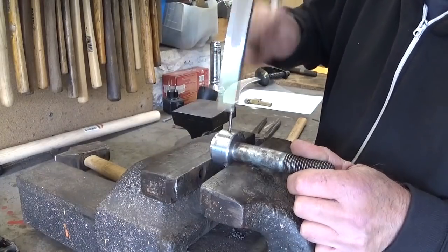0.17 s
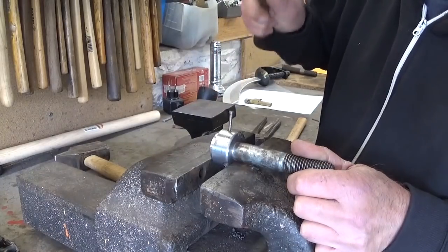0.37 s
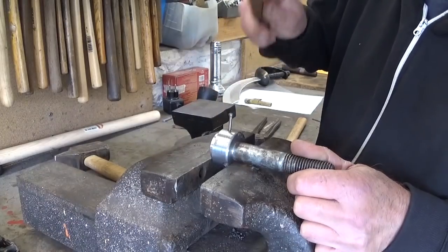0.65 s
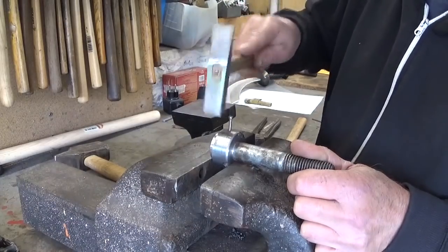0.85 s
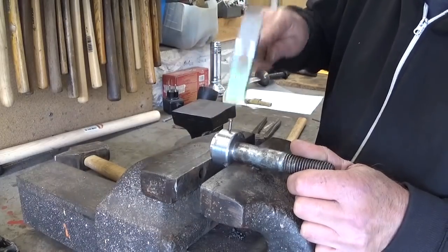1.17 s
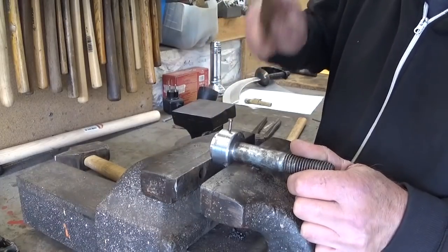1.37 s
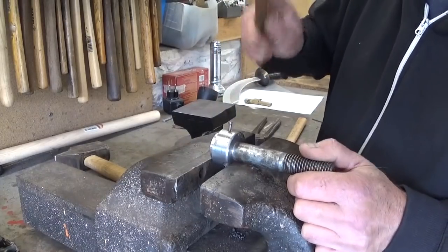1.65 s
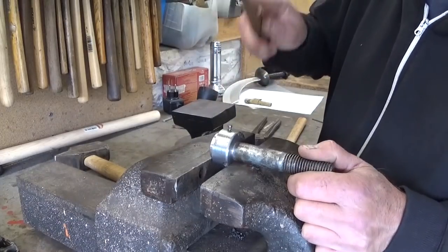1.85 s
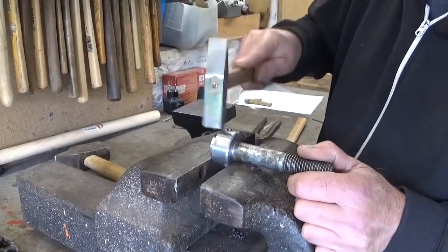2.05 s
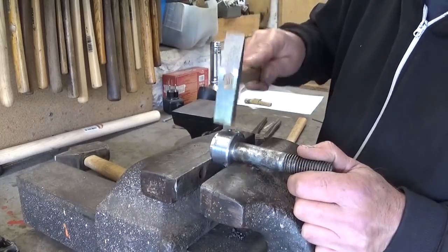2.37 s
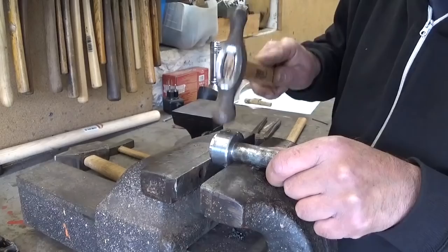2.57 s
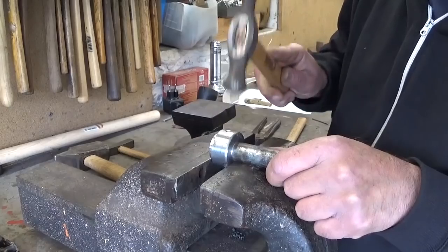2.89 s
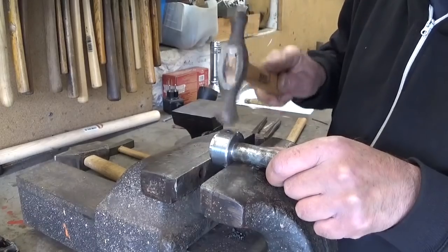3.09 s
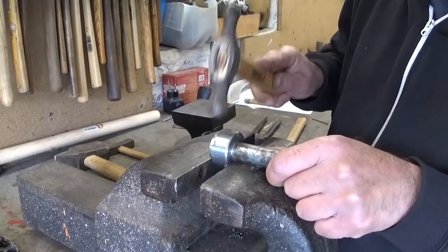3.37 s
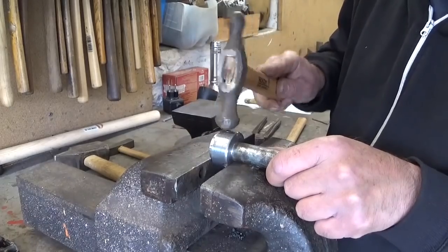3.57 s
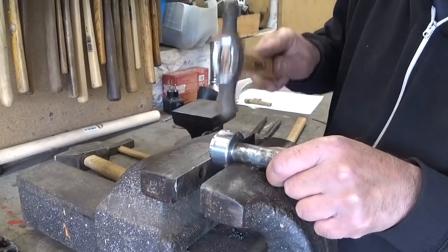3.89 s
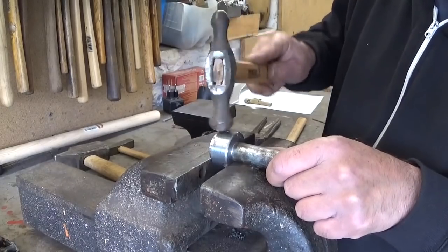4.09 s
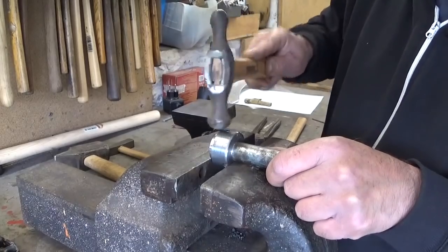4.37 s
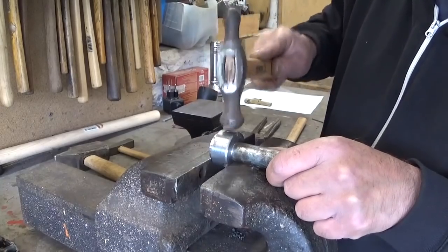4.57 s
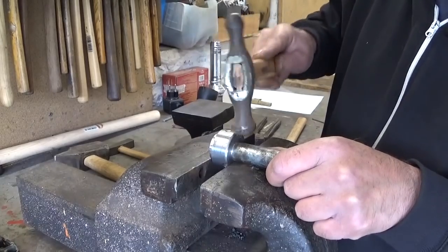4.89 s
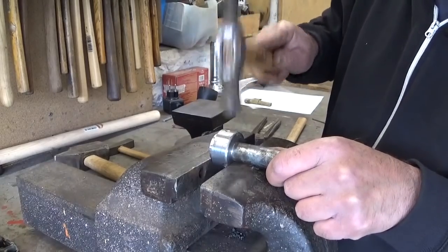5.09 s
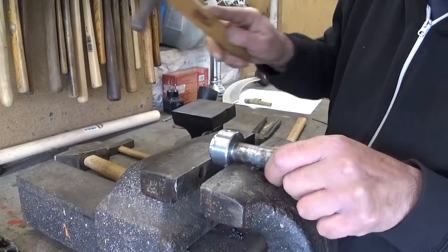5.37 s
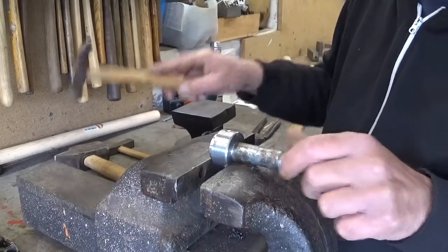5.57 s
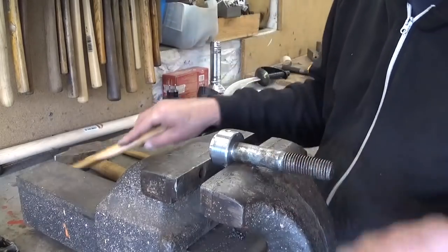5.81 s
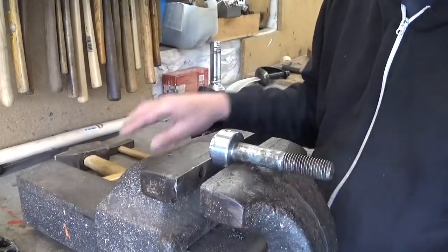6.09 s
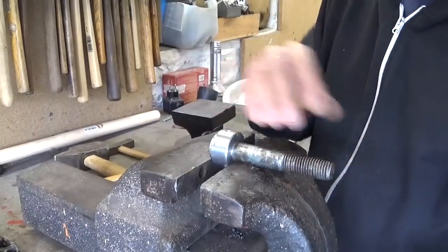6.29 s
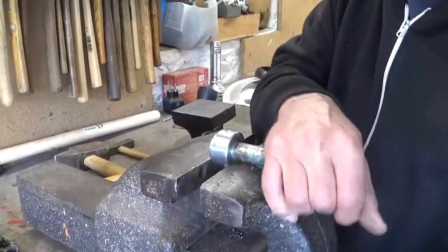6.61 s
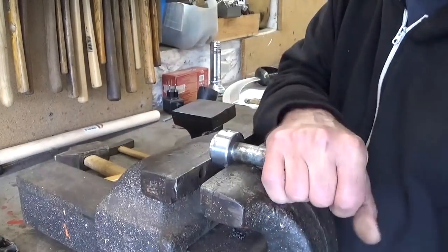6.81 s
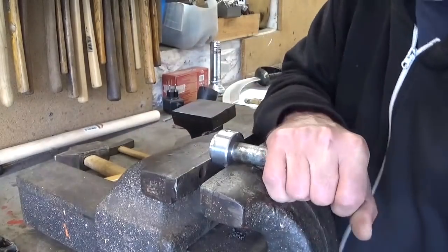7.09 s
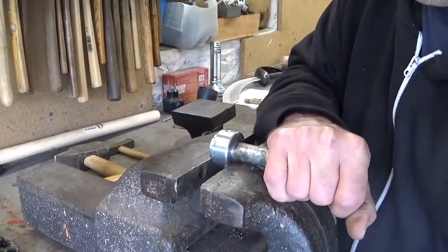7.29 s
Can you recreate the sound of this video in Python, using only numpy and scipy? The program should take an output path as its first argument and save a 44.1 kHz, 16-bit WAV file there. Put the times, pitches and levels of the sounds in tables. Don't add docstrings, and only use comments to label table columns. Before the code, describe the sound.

Close in a small, lively workshop, a flat hammer face strikes a steel pin in a vise, about three blows a second, ringing bright. The last skids into dull bounces, then the ball end taps on, rounder and steady. The hammer is laid on a hollow wooden bench and jingles against tools; finally the vise handle clunks, scrapes and drops.

```python
import sys
import numpy as np
from scipy import signal
from scipy.fft import rfft, irfft, next_fast_len
from scipy.io import wavfile
from scipy.ndimage import uniform_filter1d, minimum_filter1d

SR = 44100
rng = np.random.default_rng(int(sys.argv[2]) if len(sys.argv) > 2 else 0)


def pcm_store(signal):
    levels = np.round(np.clip(np.atleast_2d(signal), -1, 1) * 32767)
    wavfile.write(sys.argv[1], SR, levels.astype(np.int16).T)


def boost_factor(decibels):
    exponent = np.asarray(decibels, float) / 20
    return 10 ** exponent


N = 328545
TAIL = SR // 2
HUM = 7 * SR // 10


def unit(x):
    return x / np.sqrt(np.mean(x ** 2) + 1e-20)


def along(points, hz):
    f, v = np.transpose(points)
    return np.interp(np.log(hz + 1), np.log(f + 1), v)


def filtered(x, response):
    size = next_fast_len(x.shape[-1] + 4096)
    spectrum = rfft(x, size) * response(np.fft.rfftfreq(size, 1 / SR))
    return irfft(spectrum, size)[..., :x.shape[-1]]


# (frequency [Hz], likeness [0-1])
LIKENESS = [(60, 1), (150, .96), (490, .7), (1410, .76), (4030, .6), (11500, .76)]


def paired(two):
    def turn(hz):
        return np.arccos(np.clip(along(LIKENESS, hz), -1, 1)) / 2

    mid, side = filtered(two, lambda hz: np.array([np.cos(turn(hz)), np.sin(turn(hz))]))
    return np.array([mid + side, mid - side])


def ring(modes, scatter_db, size=TAIL):
    hz, db, t60 = np.transpose(modes)
    db = db + scatter_db * rng.standard_normal(hz.shape)
    hz = hz + 1.2 / t60 * rng.standard_normal(hz.shape)
    start = boost_factor(db) * np.exp(2j * np.pi * rng.random(hz.shape))
    step = boost_factor(-60 / t60 / SR) * np.exp(2j * np.pi * hz / SR)
    impulse = signal.unit_impulse(size)
    return sum(signal.lfilter([a], [1, -p], impulse).imag for a, p in zip(start, step))


def click(colour):
    cepstrum = irfft(np.log(boost_factor(along(colour, np.fft.rfftfreq(4096, 1 / SR))) + 1e-6))
    cepstrum = cepstrum * np.r_[1, 2 * np.ones(2047), 1, np.zeros(2047)]
    pulse = irfft(np.exp(rfft(cepstrum)))
    return np.pad(pulse / np.linalg.norm(pulse), (0, TAIL - 4096))


# (frequency [Hz], decay t60 [s])
SHOP_DECAY = [(100, 0.57), (300, 0.52), (750, 0.51), (2000, 0.41), (5000, 0.45), (8000, 0.37), (11000, 0.3)]
# (delay [s], length [s], level [dB])
FAR_WALL_ECHO = (.04, .014, 3)


def shop(liveliness, bloom_s, patchy_db):
    hz, t, z = signal.stft(rng.standard_normal((2, TAIL)), SR, nperseg=128)
    t60 = liveliness * along(SHOP_DECAY, hz)[:, None]
    patches = uniform_filter1d(rng.standard_normal(z.shape[1:]), size=3, axis=0)
    patches = uniform_filter1d(patches, size=14, axis=1)
    delay, length, echo_db = FAR_WALL_ECHO
    echo = echo_db * np.exp(-((t - delay) / length) ** 2)
    db = patchy_db * unit(patches) * hz[:, None] / 8000 + echo - 60 * t / t60
    tail = signal.istft(z * boost_factor(db) / np.sqrt(t60), SR, nperseg=128)[1][:, :TAIL]
    tail = paired(tail * (1 - np.exp(-np.arange(TAIL) / SR / bloom_s)))
    return tail / np.linalg.norm(tail, axis=1, keepdims=True)


# (frequency [Hz], level [dB per Hz])
FLOOR_THUD = [(20, -34.5), (35, -10), (48, -17), (68, -2), (90, -11.5), (110, -18), (200, -25), (400, -50)]


def strikes(rows, colour, body, head, part, drive_db, body_db, crack_s, direct_db,
            liveliness, thud_t60, pan_db, near_db, far_db):
    out = np.zeros((2, N + SR + 2 * TAIL))
    t = np.arange(TAIL) / SR
    blow, place = click(colour), shop(liveliness, bloom_s=0.0059, patchy_db=2)
    for s, db, head_db, thud_db, bright_db, part_db in rows:
        def slope(hz):
            return boost_factor((bright_db + 8.5) * 0.3 * np.log2((hz + 100) / 2000))

        steel = boost_factor(body_db) * ring(body, scatter_db=2)
        tool = boost_factor(head_db - 24) * ring(head, scatter_db=1.0)
        tool = tool + boost_factor(part_db - 29) * ring(part, scatter_db=-1.5)

        burst = t * boost_factor(-60 * t / crack_s) * rng.standard_normal(TAIL)
        crack = signal.fftconvolve(burst / np.linalg.norm(burst), blow[:4096])[:TAIL]
        crack = filtered(crack, lambda hz: boost_factor(4.25 * np.log2((hz + 100) / 2500)))

        room = .8 * place + .6 * shop(liveliness, bloom_s=.005, patchy_db=5)
        far = filtered(blow + steel, slope) + boost_factor(far_db) * tool
        heard = signal.fftconvolve(far[None], room, axes=1)[:, :TAIL]
        near = filtered(crack + steel, slope) + boost_factor(near_db) * tool
        heard = heard + boost_factor(direct_db) * near * (1 - np.exp(-t / 0.00043))

        noise = rng.standard_normal((2, TAIL))
        shake = paired(filtered(noise, lambda hz: boost_factor(along(FLOOR_THUD, hz))))
        shake = shake * boost_factor(-60 * t / thud_t60) * (1 - np.exp(-t / .015))
        heard = boost_factor(29.5) * heard + boost_factor(thud_db + 30.0) * shake / np.linalg.norm(shake[0])
        begin = SR + round(s * SR)
        out[:, begin:begin + TAIL] += boost_factor(db + drive_db) * heard
    return out[:, SR:SR + N] * boost_factor(pan_db * np.array([[.5], [-.5]]))


def felt(blows, feel):
    usual_db, thud_db, thud_grows, bright_db, bright_grows = feel
    return [(s, db, head_db, thud_db + thud_grows * (db - usual_db),
             bright_db + bright_grows * (db - usual_db), bolt_db)
            for s, db, head_db, bolt_db in blows]


def friction(rows, width, grain_db):
    s, db, centre = np.transpose(rows)
    start = 5 * SR
    t = np.arange(start, N) / SR
    where = np.log(np.interp(t, s, centre))
    noise = rng.standard_normal((2, len(t)))
    grains = noise * boost_factor(grain_db * unit(uniform_filter1d(rng.standard_normal(len(t)), size=60)))
    mix = 0
    for band in np.log(np.geomspace(3000, 10500, 14)):
        sound = filtered(grains, lambda hz: np.exp(-((np.log(hz + 1) - band) / 0.075) ** 2))
        mix = mix + np.exp(-((where - band) / width) ** 4) * sound
    level = boost_factor(np.interp(t, s, db, left=-120, right=-120))
    return np.pad(level * unit(paired(mix)), ((0, 0), (start, 0)))


# (frequency [Hz], level [dB per Hz])
ROOM_TONE = [(15, -32), (25, 3.5), (54, -0.5), (231, -2), (448, -2.5), (484, -3), (1870, -8.5), (2020, -9),
             (2300, -9.5), (4140, -7.5), (11200, -18), (14600, -51.5), (22000, -120)]


def air():
    noise = rng.standard_normal((2, N))
    return boost_factor(-61.5) * unit(paired(filtered(noise, lambda hz: boost_factor(along(ROOM_TONE, hz)))))


# (time [s], strength [dB], head ring [dB], bolt ring [dB])
FLAT_FACE_BLOWS = [
    (-0.07, -12.5, -33, -23.5),
                   (0.232, -12.5, -13, -16.5),
    (0.54, -11, -6, -15.5),
    (0.845, -12.5, 3.5, -18.5),
    (1.141, -10.5, -32, -30),
    (1.453, -11.5, -5, -16),
    (1.751, -15, 0.5, -39),
    (2.054, -14, 8.5, -18),
    (2.348, -8.5, -33.5, -16),
]
# (frequency [Hz], level [dB per Hz])
FLAT_COLOUR = [(71, -18.5), (120, -13), (361, -8.5), (626, -14), (987, -3), (1220, -17.5), (1810, 2.5),
               (3450, -13.5), (3800, -17.5), (5050, -14), (9620, -12.5), (10600, -14), (11200, -20),
               (14600, -53.5), (22000, -120)]
# (frequency [Hz], level [dB], decay t60 [s])
FLAT_VISE = [(355, -18, .07), (974, -9, .055), (1060, -11, .05), (1328, -16, .08), (1776, -6, .1),
             (1884, -5, .08), (2050, -12, .09), (2202, -8, .09), (2555, -3, .065), (2800, -9, .06),
             (3063, -13, .05), (4350, -16, .025), (5100, -9, .04), (5230, -11, .04), (5857, -18, .025),
             (7284, -18, .025), (7817, -18, .025), (8565, -18, .025)]
FLAT_HEAD = [(10551, 0, .08), (10590, -4, .05), (10500, -6, .04), (10640, -18, .3)]
FLAT_BOLT = [(3380, 11, 0.17), (3220, -3.5, 0.027), (3460, -9, .05)]
# (usual strength [dB], thud [dB], thud growth [dB/dB], brightness [dB], brightness growth [dB/dB])
FLAT_FEEL = (-12.5, -21.5, -1.7, -12.5, -0.4)


def flat_face():
    return strikes(felt(FLAT_FACE_BLOWS, FLAT_FEEL), FLAT_COLOUR, FLAT_VISE, FLAT_HEAD, FLAT_BOLT,
                   drive_db=2.0, body_db=-23.5, crack_s=0.046, direct_db=-15.5, liveliness=0.95,
                   thud_t60=0.93, pan_db=-0.3, near_db=11, far_db=-8.5)


# (frequency [Hz], level [dB per Hz])
STEEL_COLOUR = [(71, -49.5), (120, -11.5), (334, -4.5), (420, -2.5), (864, -3.5), (1040, -6), (1500, -4),
                (3450, -27.5), (11200, -57.5), (14600, -84), (22000, -120)]
# (frequency [Hz], level [dB], decay t60 [s])
BAR_BODY = [(412, -3, 0.14), (790, 2, 0.017), (1850, 6.5, 0.02), (2096, -3, 0.036)]
BAR_FREE = [(1640, 2, 0.045), (3360, 2.5, 0.14), (3900, -12, .04)]
BAR_KNOCKED = [(1087, 16, 0.057), (1225, 1.5, 0.06)]


def handle_steel(rows):
    return strikes(rows, STEEL_COLOUR, BAR_BODY, BAR_FREE, BAR_KNOCKED, drive_db=-7.5, body_db=-33,
                   crack_s=0.041, direct_db=4.5, liveliness=1.0, thud_t60=0.78, pan_db=0.2,
                   near_db=-5.0, far_db=-12)


# (time [s], strength [dB])
GRAZE_TIMES = [
    (0.534, -38.5),
    (1.132, -35),
    (2.049, -33),
    (6.817, -44),
]
# (time [s], strength [dB], ring [dB])
CARRY_TICKS = [
    (5.437, -50, -31.5),
    (5.55, -57, -33),
    (5.628, -51.5, -11),
]
# (ring [dB], thud [dB], brightness [dB], knock [dB])
GRAZE_SOUND = (-28.5, -32.5, 2.5, -24.5)
# (thud [dB], brightness [dB], knock [dB])
TICK_SOUND = (-36, 33, -28.5)


def grazes():
    brushed = [row + GRAZE_SOUND for row in GRAZE_TIMES]
    ticked = [row + TICK_SOUND for row in CARRY_TICKS]
    return handle_steel(brushed + ticked)


# (time [s], strength [dB], head ring [dB], bolt ring [dB])
SKID_BOUNCES = [
    (2.37, -15, -31.5, -28.5),
    (2.398, -13, -36, -33),
    (2.44, -26, -30.5, -28),
]
# (frequency [Hz], level [dB per Hz])
ROUND_COLOUR = [(71, -48), (150, -18), (250, -15.5), (370, -11), (500, -23), (620, -5.5), (880, -14.5),
                (1050, -2.5), (1440, -7.5), (2550, -2.5), (4300, -6), (5000, -16), (7240, -13.5),
                (11200, -27)]
# (usual strength [dB], thud [dB], thud growth [dB/dB], brightness [dB], brightness growth [dB/dB])
ROUND_FEEL = (-12.5, -30.5, -0.3, -9, 0.24)


def skid():
    return strikes(felt(SKID_BOUNCES, ROUND_FEEL), ROUND_COLOUR, FLAT_VISE, FLAT_HEAD, FLAT_BOLT,
                   drive_db=-1.5, body_db=-29.5, crack_s=0.03, direct_db=-10.5, liveliness=0.9,
                   thud_t60=0.6, pan_db=-2.5, near_db=5, far_db=-11.5)


# (time [s], strength [dB], head ring [dB], bolt ring [dB])
ROUND_BLOWS = [(2.605, -20.5, -15.5, -32), (2.786, -11.5, -16.5, -63), (3.049, -12.5, -21.5, -61),
               (3.311, -10, -29, -46), (3.575, -9.5, -16, -60), (3.827, -10, -13, -27.5),
               (4.089, -10.5, -21.5, -33.5), (4.358, -9, -13.5, -35), (4.621, -10, -17, -24),
               (4.885, -13, -17.5, -26), (5.165, -10.5, -18, -35)]
# (frequency [Hz], level [dB], decay t60 [s])
ROUND_VISE = [(1040, -11, .05), (1200, -19, .3), (1326, -12, .08), (1776, -14, .07), (2140, -10, .07),
              (620, -20, .05), (2420, -9, .05), (2564, -6, .045), (2800, -7, .06), (3055, -8, .05),
              (3392, -8, .05), (3870, -11, .03), (4060, -10, .03), (5173, -14, .025), (5556, -10, .025),
              (6153, -10, .025), (7962, -18, .02), (9146, -18, .02)]
ROUND_HEAD = [(7001, 4, .18), (6984, 2, .12), (7027, 0, .09)]
ROUND_BOLT = [(10640, 8, .25), (10615, 4, .15)]


def ball_end():
    return strikes(felt(ROUND_BLOWS, ROUND_FEEL), ROUND_COLOUR, ROUND_VISE, ROUND_HEAD, ROUND_BOLT,
                   drive_db=3.0, body_db=-24.0, crack_s=0.028, direct_db=-11.5, liveliness=0.92,
                   thud_t60=.7, pan_db=-1.0, near_db=4.5, far_db=-1.3)


# (frequency [Hz], level [dB], decay t60 [s])
HANGING_TOOLS = [(453, -51, 1.6), (2010, -54, 1.7)]


def wall_tools():
    out, t = np.zeros(N + HUM), np.arange(HUM) / SR
    fade = (1 - np.exp(-t / 0.0079)) * np.minimum(1, (t[-1] - t) * 10)
    for s, *_ in ROUND_BLOWS:
        out[round(s * SR):][:HUM] += ring(HANGING_TOOLS, scatter_db=0, size=HUM) * fade
    return out[:N]


# (time [s], length [s], level [dB], centre [Hz], glide [Hz])
HAND_RUBS = [
    (5.57, .25, -64, 5100, -900),
    (6.48, 0.095, -57, 8450, 5),
    (6.58, 0.24, -66.5, 8900, 102),
    (6.81, 0.34, -59.5, 9100, -300),
    (7.19, 0.12, -48, 5600, 2200),
    (7.385, 0.09, -58, 5480, 50),
]


def rubbing():
    shape = [(0, -19), (0.33, 0), (0.46, 0), (1, -19)]  # (share of length, level [dB])
    strokes = sorted((s + part * length, db + under_db, hz + part * glide_hz)
                     for s, length, db, hz, glide_hz in HAND_RUBS for part, under_db in shape)
    return friction(strokes, width=0.15, grain_db=1.5)


# (time [s], strength [dB], brightness [dB])
WOOD_LANDING = [
    (5.952, -4.5, -23.5),
    (5.985, -7, -5),
    (6.011, -39, -4),
    (6.112, -26, -41),
]
# (time [s], strength [dB], steel jingle [dB], loose bar [dB])
TOOL_RATTLE = [
    (6.136, -3, -11, -8.5),
    (6.165, -6, -9, 2.5),
    (6.205, -3, -8.5, -43),
    (6.24, -16, -34, -43),
    (6.27, -44, -19, -25),
    (6.39, -36.5, -23, -15),
]
# (frequency [Hz], level [dB per Hz])
WOOD_COLOUR = [(59, -35.5), (100, -32.5), (140, -24.5), (238, -6), (476, -8), (627, -13), (895, -17),
               (4170, -29), (7110, -55), (9380, -36), (11200, -51), (14600, -76), (22000, -120)]
# (frequency [Hz], level [dB], decay t60 [s])
BENCH_WOOD = [(230.3, -17.5, 0.75), (308.4, -16, 0.69), (344, -8.5, 0.31), (423, -7.5, 0.12),
              (532, -6, 0.18), (637, -16, 0.32), (810, -27, 0.11), (1720, -21, 0.078)]
STEEL_TOOLS = [(2190, -5, 0.03), (3190, 1.5, 0.086), (4800, -31, .04), (5270, -13, 0.06),
               (5930, -12, 0.036), (6730, -15, 0.042), (6550, -10.5, 0.07), (7400, -13, .15),
               (7600, -11.5, .05), (8450, -14, .05), (10700, -24, .05)]
LOOSE_BAR = [(4100, -1, 0.13), (4260, -13, 0.074), (9720, -25.5, 0.11), (9100, -12, 0.2)]


def bench():
    jingle_db, thud_db, loose_db = -38, -29.5, -31.5
    wood = [(s, db, jingle_db, thud_db, bright_db, loose_db) for s, db, bright_db in WOOD_LANDING]
    thud_db, bright_db = -33, -3.5
    steel = [(s, db, jingle, thud_db, bright_db, loose) for s, db, jingle, loose in TOOL_RATTLE]
    return strikes(wood + steel, WOOD_COLOUR, BENCH_WOOD, STEEL_TOOLS, LOOSE_BAR, drive_db=-8.0,
                   body_db=-34.5, crack_s=0.028, direct_db=-9.0, liveliness=0.87, thud_t60=0.65,
                   pan_db=-0.3, near_db=6, far_db=-3)


# (time [s], strength [dB], thud [dB], brightness [dB], knock [dB])
HANDLE_KNOCKS = [
    (6.821, -25, 2, 25, -18),
    (6.83, -37.5, 0.5, -40, 11),
    (6.989, -36, 3.5, -3.5, -16),
    (7.077, -23.5, -18, 7, 0.5),
    (7.174, -34.5, -14, 19, -20.5),
    (7.184, -41, 18.5, -38, 9.5),
    (7.247, -43.5, 3, 36, -37),
    (7.297, -23, -37, -18, -29),
]
# (time [s], level [dB], centre [Hz])
EYE_SLIDE = [
    (6.89, -73, 3700),
    (6.91, -45, 4370),
    (6.93, -41, 4900),
    (6.98, -41.5, 4600),
    (7.03, -44, 4360),
    (7.075, -45.5, 4300),
    (7.12, -56, 4200),
    (7.18, -66, 4200),
]


def vise_handle():
    free_db, gripped_db = -8, -37
    knocks = [(s, db, free_db if 6.9 < s < 7.12 else gripped_db, *rest)
              for s, db, *rest in HANDLE_KNOCKS]
    return handle_steel(knocks) + friction(EYE_SLIDE, width=0.21, grain_db=1.0)


def scene():
    blows = flat_face() + grazes() + skid() + ball_end() + wall_tools()
    return air() + blows + rubbing() + bench() + vise_handle()


def limited(x, top_db, hold, smooth):
    need = np.minimum(0, top_db - 20 * np.log10(np.abs(x).max(axis=0) + 1e-9))
    span = int(hold * SR) | 1
    held = minimum_filter1d(need, span, origin=span // 2)
    return x * boost_factor(uniform_filter1d(held, int(smooth * SR) | 1))


def roll_off(x):
    return signal.sosfilt(signal.butter(12, 12120, fs=SR, output="sos"), x)


# (frequency [Hz], left minus right [dB])
MIC_BALANCE = [(60, -.3), (125, -1.6), (250, -.9), (500, .3), (1500, 1.1), (5000, .8), (11000, -.3)]
# (frequency [Hz], left leads by [rad])
MIC_LEAD = [(60, .08), (95, .15), (140, .7), (300, .7), (600, .5), (2500, .03), (4100, .15), (11000, .02)]
# (frequency [Hz], level [dB])
BAND_LIMIT = [(20, 2), (10900, 0), (11300, -25), (12000, -39), (16000, -70), (17000, -120)]


def record(dry):
    half = np.array([[.5], [-.5]])
    mics = filtered(dry, lambda hz: boost_factor(along(MIC_BALANCE, hz) * half) * np.exp(1j * along(MIC_LEAD, hz) * half))
    flattened = limited(mics, top_db=-6.0, hold=0.0082, smooth=0.0012)
    mix = filtered(flattened, lambda hz: boost_factor(along(BAND_LIMIT, hz)))
    return roll_off(mix)


dry = scene()
out = record(dry)
pcm_store(out)
```